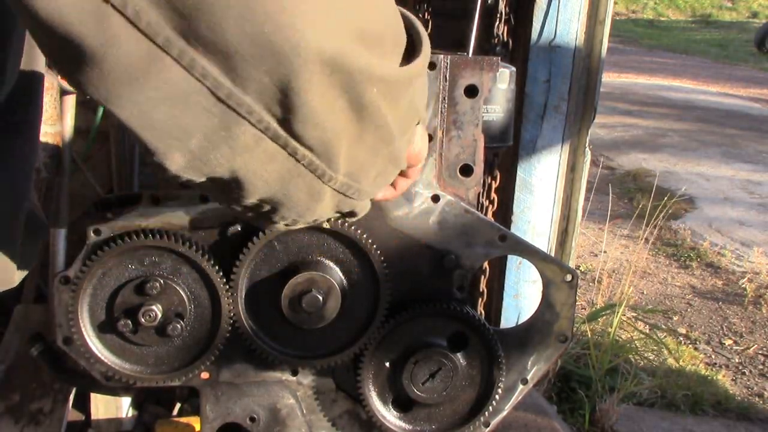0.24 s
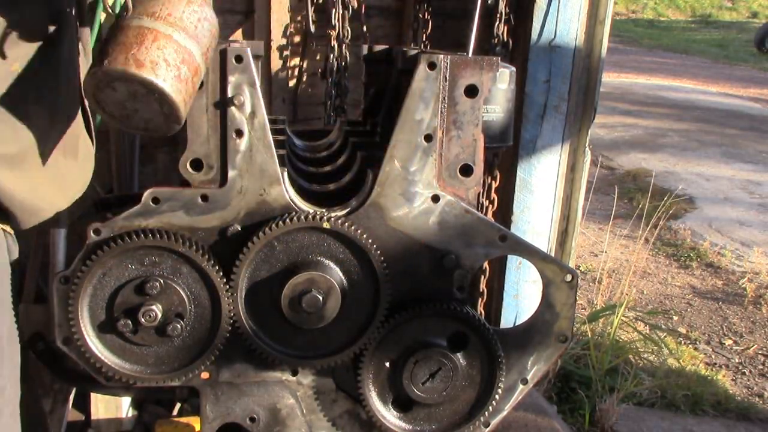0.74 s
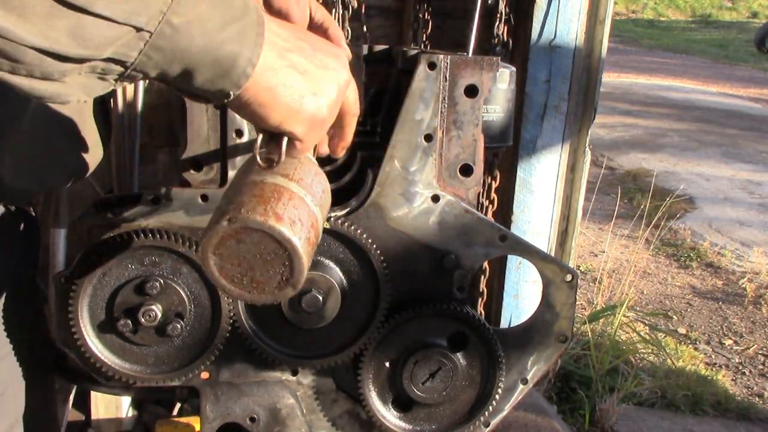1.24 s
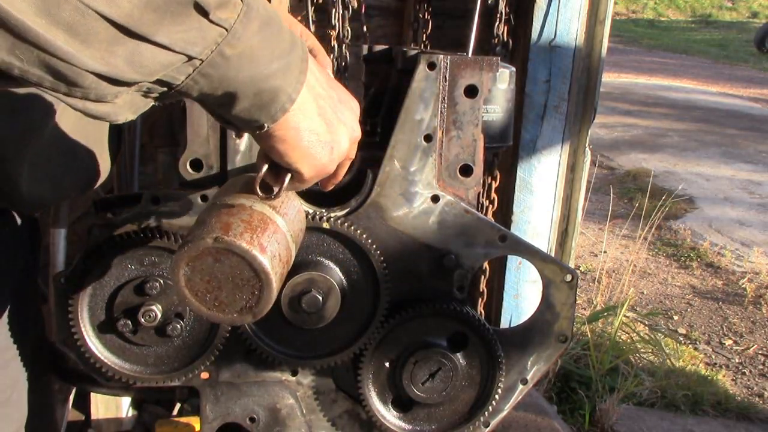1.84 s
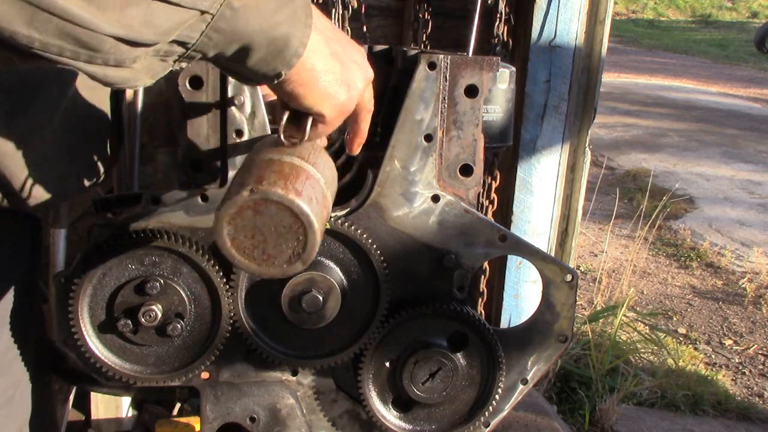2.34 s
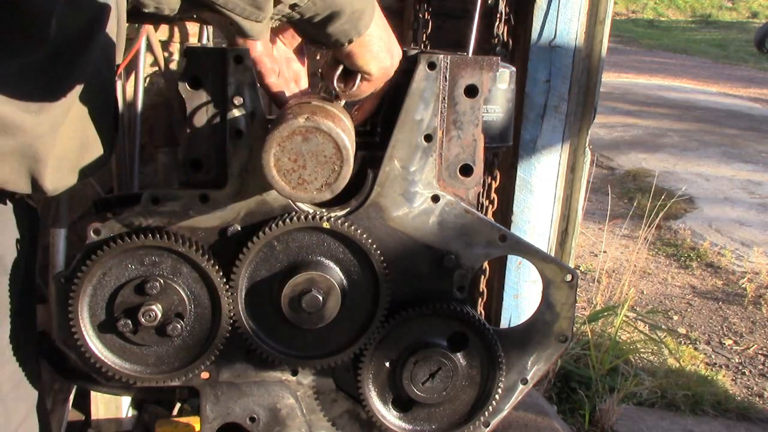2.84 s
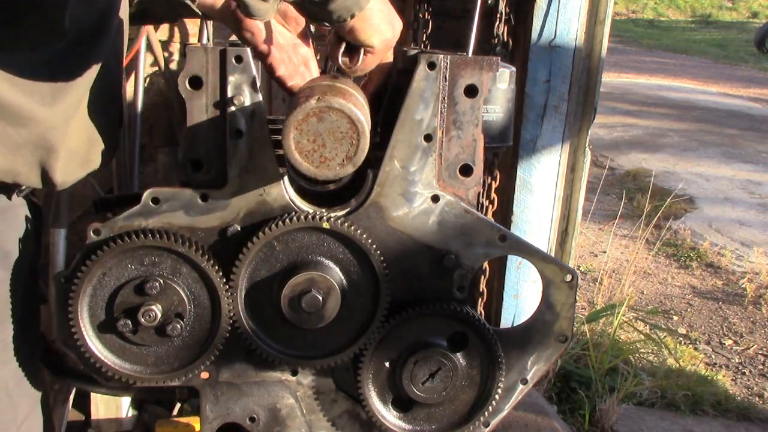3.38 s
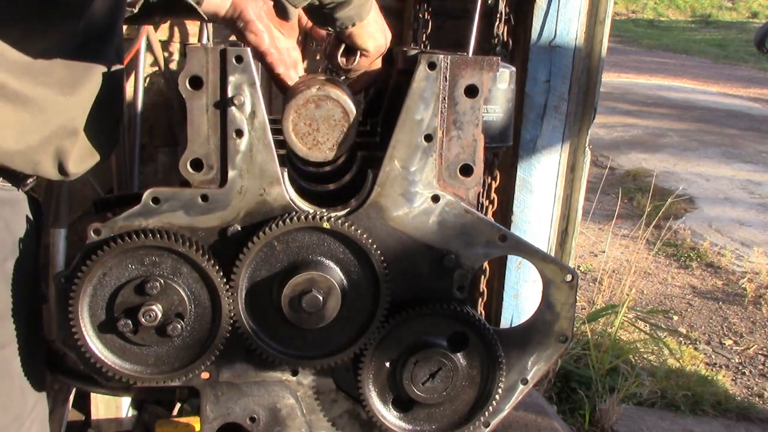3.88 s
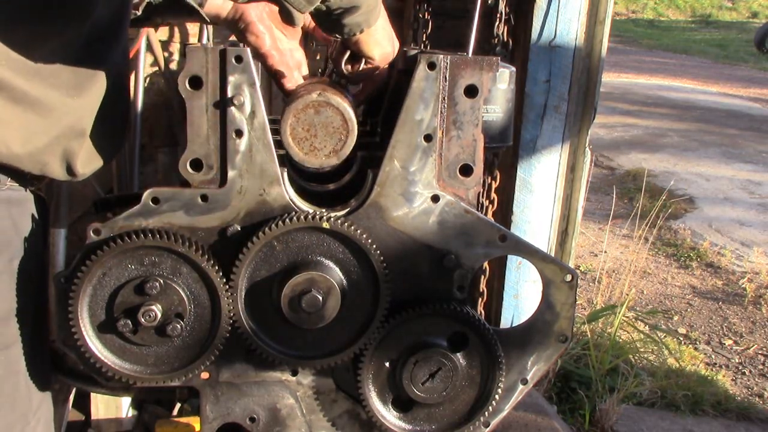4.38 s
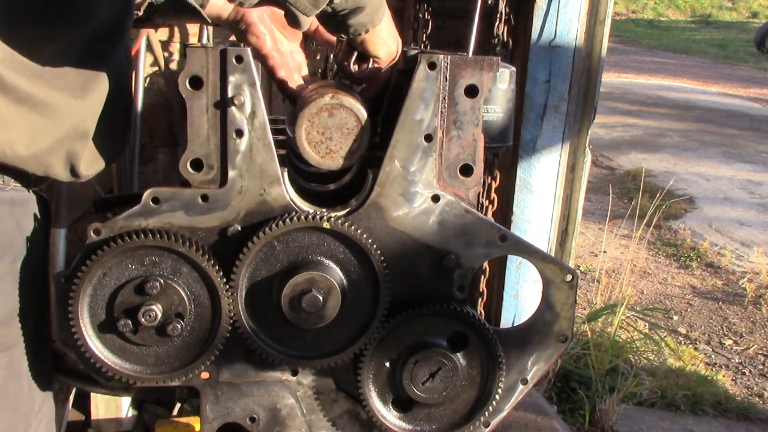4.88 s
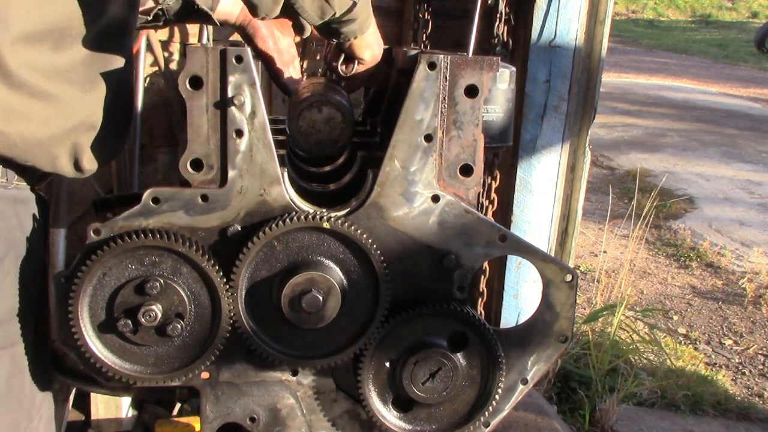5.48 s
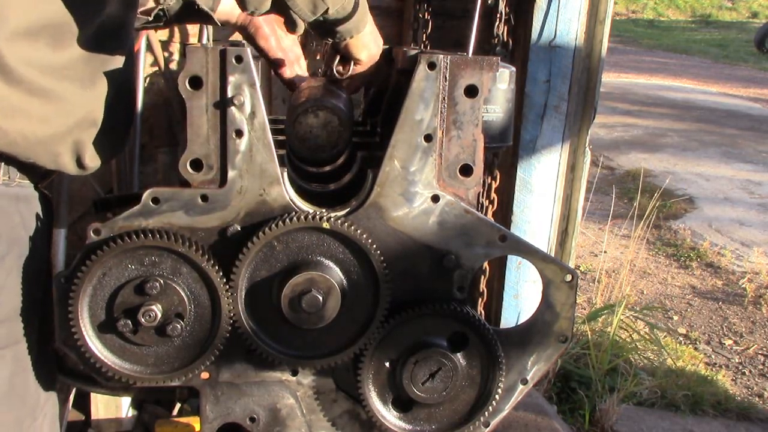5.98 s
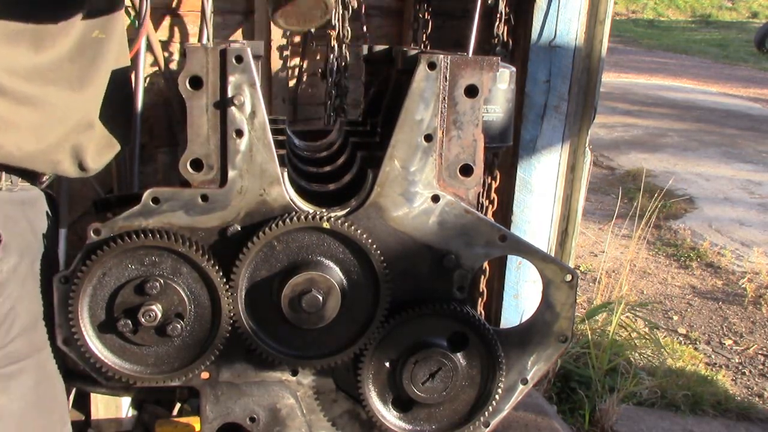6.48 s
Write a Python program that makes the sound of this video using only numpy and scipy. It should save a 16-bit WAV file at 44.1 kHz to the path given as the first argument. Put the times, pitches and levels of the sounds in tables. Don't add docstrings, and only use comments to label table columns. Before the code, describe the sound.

Close by, a hand lifts a tin can with a brief scrape and bright ringing clink, then drags it over grit. After a pause comes a sharp spout knock, then a louder, hollow body knock on iron. Small dry plunger clicks and rubs follow, ending with light handle clinks and a dull bump. Open shed, short echo, close stereo microphone, low outdoor rumble and faint hiss.

```python
import sys
import numpy as np
from scipy import signal
from scipy.fft import rfft, irfft
from scipy.io import wavfile
from scipy.ndimage import uniform_filter1d

SR = 44100
rng = np.random.default_rng(int(sys.argv[2]) if len(sys.argv) > 2 else 0)


def gain_from_db(level_db):
    decades = np.asarray(level_db, float) / 20
    return 10 ** decades


def output_pcm(signal):
    pcm = np.clip(np.atleast_2d(signal).T, -1, 1) * 32767
    wavfile.write(sys.argv[1], SR, np.round(pcm).astype(np.int16))


N = 296524

# (frequency [Hz], width [Hz], level [dB])
SHELF_PEAKS = [(1950, 280, 3), (2960, 450, 3), (3540, 180, 0.5), (4900, 1800, 1.5)]


def evened(x):
    return x / np.sqrt(np.mean(x ** 2) + 1e-20)


def read(points, hz):
    f, value = np.transpose(points)
    return np.interp(np.log(hz + 1), np.log(f + 1), value)


def add(mix, s, sound):
    part = mix[round(s * SR):][:len(sound)]
    part += sound[:len(part)]


def coloured(x, spectrum):
    gain = gain_from_db(read(spectrum, np.fft.rfftfreq(len(x), 1 / SR)))
    return evened(irfft(rfft(x) * gain, len(x)))


def resonate(x, hz, width):
    turn = np.exp(2j * np.pi * np.cumsum(hz * np.ones(len(x))) / SR)
    r = np.exp(-np.pi * width / SR)
    return 2 * (turn * signal.lfilter([1 - r], [1, -r], x / turn)).real


def fuzzy_tone(length, hz, width):
    noise = rng.standard_normal(length)
    return evened(resonate(resonate(noise, hz, width), hz, width))


def ring(modes, t):
    return sum(gain_from_db(db - 60 * t / t60) * np.sin(2 * np.pi * hz * t) for hz, db, t60 in modes)


def air():
    # (frequency [Hz], level per Hz [dB])
    air_colour = [(8.8, -45), (15, -1.5), (70, -9.5), (190, -19.5), (518, -26.5), (899, -27.5), (1010, -30),
                  (15400, -41)]
    # (frequency [Hz], side minus mid [dB])
    air_side = [(60, -23), (200, -13), (700, -8), (4400, -1.5), (15000, 0.5)]
    air_db, drone_hz, drone_width_hz, drone_db = -55.5, 733, 118, -71
    frames, hz = N // 512 + 5, np.fft.rfftfreq(2048, 1 / SR)
    a, b, c, d, patches = rng.standard_normal((frames, 1025, 5)).T
    patches = uniform_filter1d(patches, size=20, axis=0)
    patches = evened(uniform_filter1d(patches, size=8, axis=1))
    z = np.array([a + 1j * b, (c + 1j * d) * gain_from_db(read(air_side, hz))[:, None]])
    z = z * gain_from_db(read(air_colour, hz)[:, None] + 0.5 * patches)
    mid, side = signal.istft(z, nperseg=2048, noverlap=1536)[1][:, :N]
    drone = gain_from_db(drone_db) * fuzzy_tone(N, drone_hz, drone_width_hz)
    return gain_from_db(air_db) / np.std(mid) * np.array([mid + side, mid - side]) + drone


def plank(low):
    # (time [s], length [s], level [dB], frequency [Hz])
    shudders = [
        (0.82, 0.17, -57.5, 84.3),
        (0.968, 0.1, -56.5, 99.8),
        (6.511, 0.22, -42.5, 100.2),
    ]
    attack_s, rise_db, fade_db_per_s = 0.025, 10, 54
    beat_hz, beat_depth = 19, 0.21
    for s, length, db, hz in shudders:
        t = np.arange(0, length, 1 / SR)
        rise = rise_db * np.maximum(1 - t / attack_s, 0)
        fade = fade_db_per_s * np.maximum(t - attack_s, 0)
        throb = 1 + beat_depth * np.cos(2 * np.pi * beat_hz * (t - attack_s))
        tone = np.sqrt(2) * np.sin(2 * np.pi * hz * t) * signal.windows.tukey(len(t), .08)
        add(low, s, gain_from_db(db - rise - fade) * throb * tone)


def bumps(near):
    # (time [s], level [dB], frequency [Hz], width [Hz], t60 [s])
    blows = [
        (0.447, -50.5, 240, 140, 0.2),
        (1.298, -58, 495, 200, 0.36),
        (1.339, -56, 450, 160, 0.16),
        (6.499, -42, 190, 300, 0.037),
        (5.4, -59, 360, 110, 0.21),
    ]
    t = np.arange(SR // 5) / SR
    for s, db, hz, width, t60 in blows:
        body = fuzzy_tone(len(t), hz, width)
        add(near, s, gain_from_db(db - 60 * t / t60) * body * (1 - np.exp(-t / 0.00028)))


def rub(near, strokes, shares, colour, peaks, grit_db=2.5):
    edge_db = -11.5
    for s, attack, hold, release, db in strokes:
        t = np.arange(0, attack + hold + release, 1 / SR)
        pressure = np.interp(t, [0, attack, attack + hold, attack + hold + release], [0, 1, 1, 0])
        slips, clumps = rng.standard_normal((len(t), 2)).T
        clumps = evened(uniform_filter1d(uniform_filter1d(clumps, size=70), size=70))
        rung = 0
        for hz, width, peak_db in peaks:
            rung = rung + gain_from_db(peak_db) * evened(resonate(resonate(slips, hz, width), hz, width))
        share = np.clip(shares[0] + (shares[1] - shares[0]) * pressure, 0, 1)
        sound = np.sqrt(1 - share) * coloured(slips, colour) + np.sqrt(share) * evened(rung)
        level = gain_from_db(db + edge_db * (1 - pressure) + grit_db * clumps)
        add(near, s, level * sound * signal.windows.tukey(len(t), .1))


def sleeves(near):
    # (start [s], attack [s], hold [s], release [s], level [dB])
    strokes = [(.12, 0.088, 0.036, .02, -65), (.6, 0.024, 0.062, 0.027, -60),
               (.41, 0.048, 0.062, 0.05, -60), (1.0, 0.17, 0.045, 0.16, -61),
               (1.33, 0.059, 0.063, .08, -65), (1.61, 0.029, 0.0046, 0.021, -59.5),
               (1.67, 0.0073, .005, 0.032, -64), (6.2, 0.097, .01, 0.062, -64),
               (6.39, 0.042, .005, 0.0067, -63), (6.49, 0.0073, .01, 0.11, -61),
               (6.59, 0.011, .005, 0.14, -62.5)]
    # (frequency [Hz], level per Hz [dB])
    cloth = [(300, 4), (800, -3), (2000, -2.5), (4000, -1), (7000, -6.5), (10000, -13), (15000, -65)]
    rub(near, strokes, (.05, 0.0089), cloth, SHELF_PEAKS, 0.6)


def lift(near):
    # (start [s], attack [s], hold [s], release [s], level [dB])
    strokes = [
        (.24, 0.073, 0.069, 0.035, -54),
    ]
    # (frequency [Hz], level per Hz [dB])
    scrape = [(300, -6), (600, -3), (2000, -4.5), (6000, -7.5), (9000, -12), (15000, -39)]
    # (frequency [Hz], width [Hz], level [dB])
    peaks = [(2757, 85, 8), (5060, 250, -10), (5950, 200, -7), (1880, 370, -9)]
    rub(near, strokes, (.02, 0.28), scrape, peaks)


def drag(near):
    # (start [s], attack [s], hold [s], release [s], level [dB])
    strokes = [
        (.7, 0.065, 0.0056, .01, -56.5),
        (.774, 0.021, 0.14, 0.077, -50.5),
    ]
    # (frequency [Hz], level per Hz [dB])
    scrape = [(300, 1), (800, -2), (1500, -0.5), (5000, -1), (9000, -4), (12000, -14.5), (15000, -43)]
    rub(near, strokes, (.12, 0.28), scrape, SHELF_PEAKS, 2.3)


def plunger(near):
    # (start [s], attack [s], hold [s], release [s], level [dB])
    strokes = [(2.135, 0.032, 0.011, 0.004, -55.5), (2.89, 0.033, 0.077, .015, -70.5),
               (3.16, 0.022, .008, 0.054, -56), (4.245, 0.025, 0.048, 0.0088, -62.5),
               (4.58, 0.056, .01, 0.034, -66.5), (4.86, 0.014, 0.029, .003, -59.5),
               (5.511, .008, 0.0046, 0.016, -53), (5.54, .004, .004, 0.03, -63),
               (5.75, .03, .035, .03, -72), (5.853, 0.013, .004, 0.028, -57.5),
               (5.878, .01, .004, .004, -58)]
    # (start [s], attack [s], hold [s], release [s], level [dB])
    squeak = [
        (4.25, 0.022, 0.081, .03, -69.5),
    ]
    # (frequency [Hz], level per Hz [dB])
    scrape = [(300, -3), (900, -9), (2000, -0.5), (3000, -12), (5000, -6), (8000, -13), (15000, -43)]
    # (frequency [Hz], width [Hz], level [dB])
    tube_peaks = [(1530, 160, -5), (2200, 150, -3.5), (2900, 320, 6), (4400, 230, -10), (870, 96, -0.5)]
    # (frequency [Hz], width [Hz], level [dB])
    rod_peak = [(4400, 90, -1)]
    rub(near, strokes, (0.48, 0.81), scrape, tube_peaks)
    rub(near, squeak, (.95, 1), scrape, rod_peak)


def tick(near, rows, puff_t60, ring_db, bottom_db):
    t = np.arange(SR // 5) / SR
    for s, db, hz in rows:
        puff = fuzzy_tone(len(t), hz, 0.53 * hz) * gain_from_db(-60 * t / puff_t60)
        tin = ring([(hz, ring_db, .1), (867, bottom_db, 0.11)], t)
        add(near, s, gain_from_db(db) * (puff + tin) * (1 - np.exp(-t / 0.00069)))


def ticks(near):
    # (time [s], level [dB], centre [Hz])
    grit = [(.782, -48, 3760), (.897, -46, 1950), (.781, -45.5, 1940), (.801, -49, 2000), (.82, -46, 2000),
            (.876, -48, 1980), (.864, -43, 3000), (.849, -46, 3020), (.887, -49, 5600), (.917, -53, 3060),
            (.936, -44, 4940), (.8198, -41.5, 4680), (.869, -40, 5000), (1.003, -48, 3900),
            (1.012, -49, 4100), (1.631, -55, 2200), (1.678, -53.5, 3050), (1.683, -57, 5530),
            (1.985, -56, 2090), (2.180, -36, 2200), (2.857, -46.5, 2410), (2.863, -57, 4330),
            (3.831, -58, 6600), (3.8305, -50.5, 4100), (3.832, -57, 2200), (5.522, -48, 3820),
            (5.534, -64, 2970), (5.57, -54, 1610), (5.569, -57, 3900), (6.301, -53.5, 1950),
            (6.303, -56.5, 4500), (6.315, -58, 3500), (6.386, -53, 1920), (6.40, -53, 3800),
            (6.498, -52, 930), (6.521, -55, 6000), (6.523, -55, 8800), (6.61, -58, 4500),
            (6.646, -58, 1500), (.654, -54, 3250)]
    # (time [s], level [dB], centre [Hz])
    pings = [(.569, -45, 7200), (.574, -44, 8240), (1.985, -55, 4390), (4.292, -54, 2500),
             (5.514, -47, 2470), (5.803, -58, 2270), (5.864, -60, 2900)]
    # (time [s], level [dB], centre [Hz])
    plinks = [(1.8378, -62, 1620), (3.19, -54.5, 2955), (3.215, -54.5, 2760), (3.835, -53, 4400),
              (5.894, -56.5, 1570)]
    # (time [s], level [dB], centre [Hz])
    snaps = [
        (.8328, -29, 4900),
        (5.546, -36, 3400),
    ]
    tick(near, grit, puff_t60=0.033, ring_db=-28, bottom_db=-24)
    tick(near, pings, puff_t60=0.018, ring_db=-6.5, bottom_db=-34)
    tick(near, plinks, puff_t60=0.049, ring_db=0.5, bottom_db=-1.2)
    tick(near, snaps, puff_t60=0.01, ring_db=-29, bottom_db=-31)


def pair():
    # (early [Hz], late [Hz], slide centre [s], slide time [s], level [dB], fade [dB per s])
    tones = [(2698, 2726, .597, .004, -31.5, 160), (2888, 2856, .59, .025, -37.5, 135)]
    start_s, grip_s, grip_db_per_s = .5566, .645, 205
    touch_s, touch_length_s, touch_db = .593, .011, -6
    t, out = np.arange(SR // 4) / SR, 0
    now = t + start_s
    for early_hz, late_hz, centre, slide, db, fade in tones:
        hz = early_hz + (late_hz - early_hz) * (.5 + .5 * np.tanh((now - centre) / slide))
        level_db = db - fade * t - grip_db_per_s * np.maximum(now - grip_s, 0)
        level_db += touch_db * np.exp(-((now - touch_s) / touch_length_s) ** 2)
        out = out + gain_from_db(level_db) * np.sin(2 * np.pi * np.cumsum(hz) / SR)
    return start_s, out


def thud():
    s, db, hz, swell_s = 2.6935, -18, 570, .0009
    t = np.arange(SR // 50) / SR
    return s, gain_from_db(db) * t / swell_s * np.exp(1 - t / swell_s) * np.sin(2 * np.pi * hz * t)


def click(spectrum):
    log_gain = np.log(gain_from_db(read(spectrum, abs(np.fft.fftfreq(2048, 1 / SR)))))
    pulse = np.fft.ifft(np.exp(np.conj(signal.hilbert(log_gain)))).real
    return pulse / abs(pulse).max()


def crack(contact, click_db, crack_db):
    # (frequency [Hz], level per Hz [dB])
    clink = [(200, 5.5), (600, -7.5), (1000, -4), (1400, 3.5), (2500, -29), (6000, -3.5), (11500, -19),
             (15000, -35)]
    # (frequency [Hz], level per Hz [dB])
    spout = [(200, -27), (500, -29), (1500, 1), (2700, 4), (4000, -11), (8400, -2), (12000, -12),
             (15000, -41)]
    # (frequency [Hz], level per Hz [dB])
    body = [(100, -32.5), (300, 0), (700, -3), (1200, -10.5), (2400, -0.5), (4000, -12), (6500, -18),
            (15000, -46)]
    # (frequency [Hz], level per Hz [dB])
    stop = [(200, -16), (500, -5.5), (900, -6.5), (1200, -11.5), (2300, -12), (3500, -20), (6000, -24.5),
            (15000, -65)]
    # (frequency [Hz], level per Hz [dB])
    tap = [(500, -31), (1500, -3), (3000, 2), (5000, -8), (8000, -3.5), (15000, -18)]
    # (frequency [Hz], level [dB])
    burst_colour = [(300, -12), (900, -5), (1800, -1.5)]
    colour = dict(CLINK=clink, SPOUT=spout, BODY=body, STOP=stop, TAP=tap)[contact]
    t60 = dict(CLINK=0.031, SPOUT=0.024, BODY=0.051, STOP=0.038, TAP=0.029)[contact]
    t = np.arange(SR // 5) / SR
    burst = coloured(coloured(rng.standard_normal(len(t)), colour), burst_colour)
    burst = burst * gain_from_db(crack_db - 60 * t / t60) * (1 - np.exp(-t / 0.00017))
    add(burst, 0, gain_from_db(click_db) * click(colour))
    return burst


def ringing_part(part, ring_db, damp_s):
    # (frequency [Hz], level [dB], t60 [s])
    rim = [(578, -53, .3), (4540, -44, .1), (5079, -37, .27), (5138, -46, .2), (5415, -41, .22),
           (3677, -60, .25), (6430, -52, .28), (7144, -51, .2), (7222, -44.5, .17), (8070, -50, .17),
           (7590, -50, .1), (8280, -56, .3), (2270, -51, .15), (8904, -54, .15)]
    # (frequency [Hz], level [dB], t60 [s])
    band = [(5797, -33.5, .14), (5864, -40, .12), (5620, -39, .05), (6000, -40, .045), (5250, -42, .04),
            (6750, -44, .03)]
    # (frequency [Hz], level [dB], t60 [s])
    belly = [(787, -33.5, .13)]
    # (frequency [Hz], level [dB], t60 [s])
    lid = [(5713, -58, .3), (5866, -53, .35), (6050, -56, .06), (8105, -44, .05), (7693, -59, .4),
           (8270, -54, .08), (8900, -57, .15)]
    # (frequency [Hz], level [dB], t60 [s])
    nozzle = [(1350, -50, .11), (1600, -46, .03), (2180, -45, .035), (2405, -44, .04), (2662, -53, .25),
              (2764, -57, .27), (2715, -36, .045), (2934, -30.5, .035), (3970, -52, .07), (4357, -43, .06),
              (5706, -44, .04), (5943, -53, .1), (8148, -50, .07), (8570, -52, .06)]
    # (frequency [Hz], level [dB], t60 [s])
    drum = [(281, -36, .06), (370, -43, .14), (5950, -39, .035), (829, -33, .1), (1028, -48, .17),
            (1715, -52, .35), (2256, -43, .06), (2480, -33, .022), (2652, -52, .4), (2762, -38, .15),
            (2950, -43, .14), (1540, -41, .08), (3750, -43, .1), (5410, -46, .07)]
    # (frequency [Hz], level [dB], t60 [s])
    pump = [(867, -53, .14), (1494, -58, .05), (2242, -62, .05), (2883, -55, .07), (4367, -53.5, .13),
            (4100, -55, .03), (5737, -54, .05), (5560, -58, .09)]
    # (frequency [Hz], level [dB], t60 [s])
    seat = [(867, -47, .36), (881, -42.5, .05), (1580, -55, .04), (2300, -56, .04)]
    # (frequency [Hz], level [dB], t60 [s])
    rod = [(1600, -61, .09), (2870, -57, .21), (3025, -53, .06), (4680, -64, .13), (4405, -64, .07),
           (2336, -64, .05)]
    # (frequency [Hz], level [dB], t60 [s])
    handle = [(1619, -58, .07), (2690, -50, .4), (4377, -51, .05), (5272, -61, .4), (5767, -56, .05)]
    # (frequency [Hz], level [dB], t60 [s])
    loop = [(2690, -59, .8), (4630, -48, .07), (4480, -50, .06), (4300, -53, .04), (5767, -51, .06),
            (5290, -60, .3), (7255, -52, .14), (6950, -54, .03), (9150, -58, .05)]
    modes = dict(RIM=rim, LID=lid, NOZZLE=nozzle, DRUM=drum, PUMP=pump, SEAT=seat, ROD=rod,
                 HANDLE=handle, LOOP=loop, BAND=band, BELLY=belly)[part]
    t = np.arange(SR // 3) / SR
    damping_db = 600 * np.maximum(t - damp_s, 0)
    return ring(modes, t) * gain_from_db(ring_db - damping_db) * (1 - np.exp(-t / .0003))


def knocks(near, tin):
    # (time [s], click [dB], crack [dB], ring [dB], fingers damp the ring after [s])
    blows = [(0.5569, -38, -30, 0, 0.054), (0.612, -67, -56, -1, 0.1), (2.1828, -28, -32, 0, 0.07),
             (2.6937, -21, -27, 0, 0.16), (4.111, -37, -45.5, -1, .05), (4.3285, -32, -46, 1, 0.19),
             (4.337, -46, -47, -2, .1), (4.9086, -34.5, -44, -2.5, .04), (4.9165, -38, -45, 2, 0.055),
             (5.902, -34.5, -48, 2, .07), (6.451, -45, -49, 0, 0.033), (6.458, -42, -50, 0, 0.12),
             (0.5570, -70, -60, 0, .024), (2.1842, -33, -46, 0, .056), (2.192, -36, -45, -30, .02),
             (.8326, -27, -50, -30, .02)]
    contacts = "CLINK TAP SPOUT BODY TAP STOP TAP STOP TAP TAP CLINK TAP TAP STOP SPOUT TAP".split()
    parts = "RIM LID NOZZLE DRUM PUMP SEAT ROD SEAT ROD ROD HANDLE LOOP BAND BELLY BELLY BELLY".split()
    for (s, click_db, crack_db, ring_db, damp_s), part, contact in zip(blows, parts, contacts):
        add(near, s, crack(contact, click_db, crack_db))
        add(tin, s, ringing_part(part, ring_db, damp_s))
    add(tin, *pair())
    add(tin, *thud())


def shed(x):
    # (frequency [Hz], t60 [s])
    decay = [(150, 0.32), (1000, 0.15), (4000, 0.2), (12000, 0.28)]
    taps = np.zeros((2, SR // 3))
    at = np.arange(120, SR // 3 - 20, 20)
    at = at + rng.integers(0, 20, (2, len(at)))
    np.put_along_axis(taps, at, rng.choice([-1., 1.], at.shape), 1)
    hz, t, z = signal.stft(taps, SR, nperseg=128)
    tail = signal.istft(z * gain_from_db(-60 * t / read(decay, hz)[:, None]), SR, nperseg=128)[1]
    tail = tail[0] + 0.11 * np.array([tail[1], -tail[1]])
    return signal.fftconvolve(x[None], tail / np.linalg.norm(tail[0]), axes=1)[:, :N]


def scene():
    near, tin, low = np.zeros((3, N))
    plank(low)
    bumps(near)
    sleeves(near)
    lift(near)
    drag(near)
    plunger(near)
    ticks(near)
    knocks(near, tin)
    direct = np.array([np.roll(near + tin, 1), near + tin])
    echo = gain_from_db(-10) * shed(near + gain_from_db(-9.0) * tin)
    return direct + echo + low + air()


def band_limit(x):
    return signal.sosfilt(signal.butter(12, 15600, fs=SR, output="sos"), x)


def record(dry):
    # (frequency [Hz], level [dB])
    microphone = [(6000, 1.5), (10000, -0.2), (13000, -2), (15500, -4)]
    heard = irfft(rfft(dry) * gain_from_db(read(microphone, np.fft.rfftfreq(N, 1 / SR))), N)
    low_pass = signal.firwin(511, 15550, window=("kaiser", 9), fs=SR)
    mix = signal.oaconvolve(heard, low_pass[None], "same")
    return band_limit(mix)


dry = scene()
out = record(dry)
output_pcm(out)
```